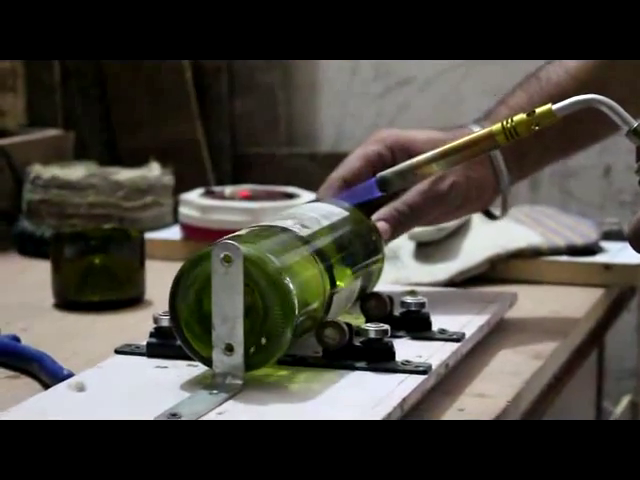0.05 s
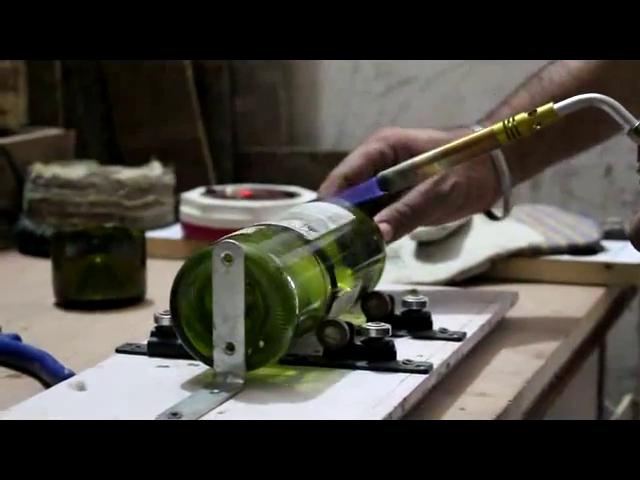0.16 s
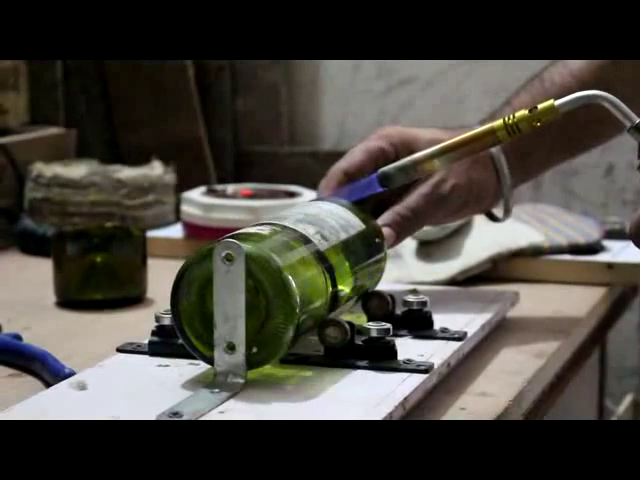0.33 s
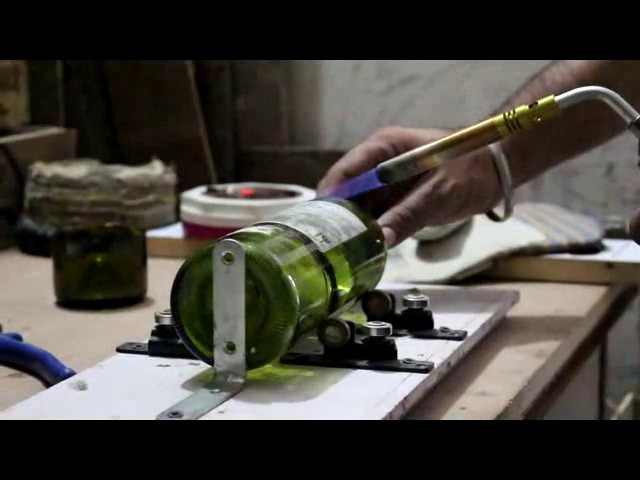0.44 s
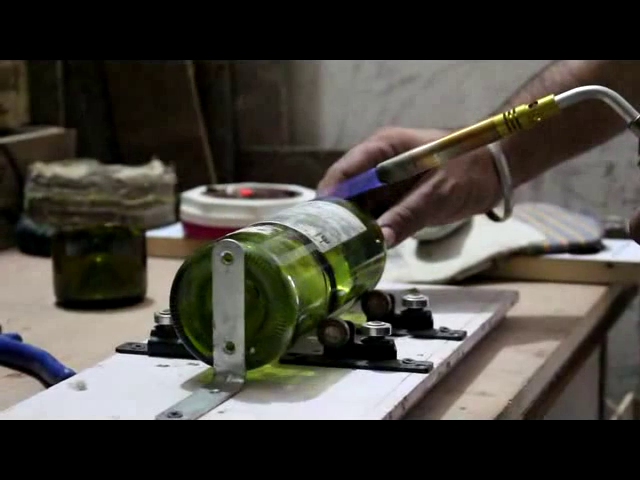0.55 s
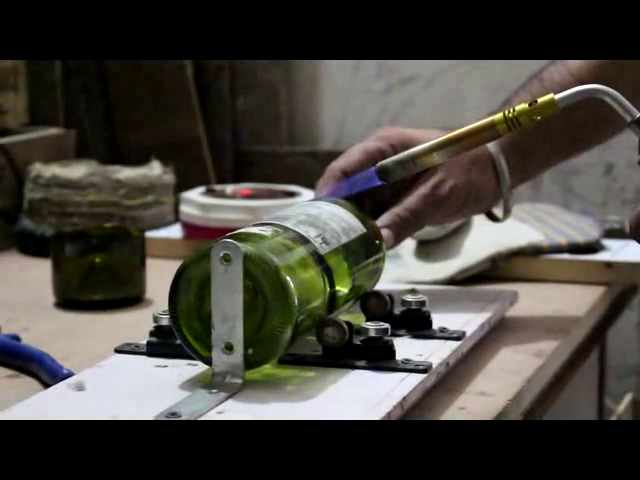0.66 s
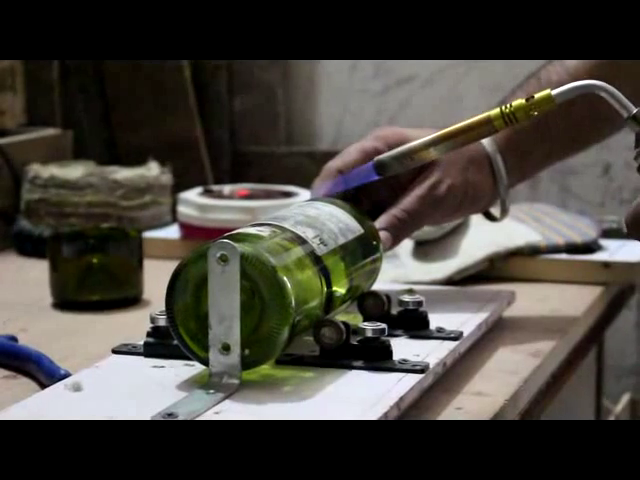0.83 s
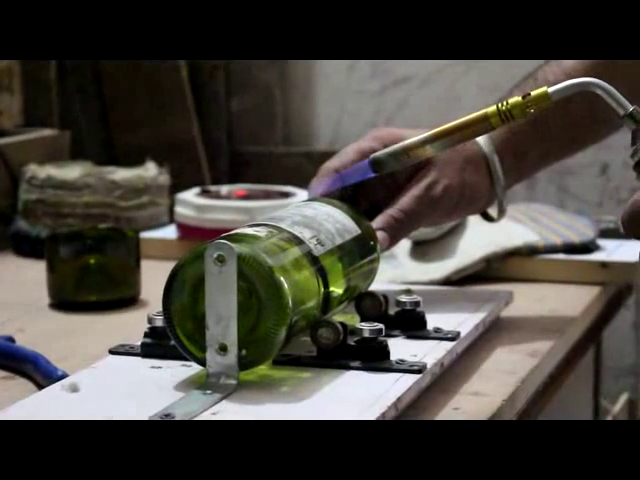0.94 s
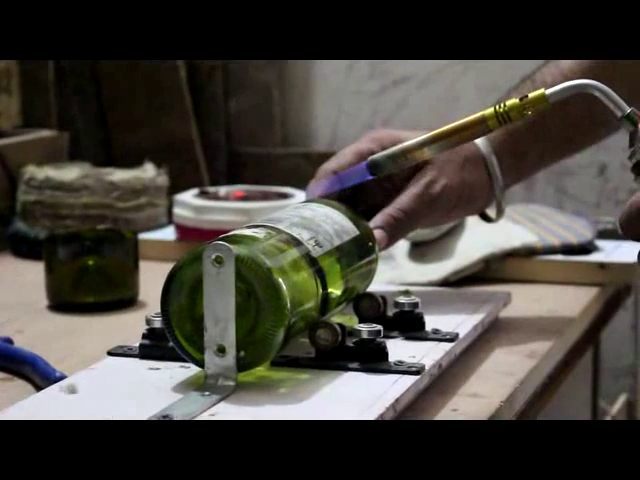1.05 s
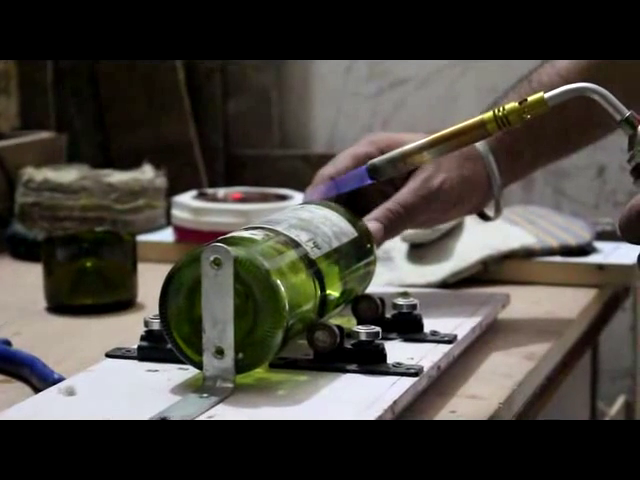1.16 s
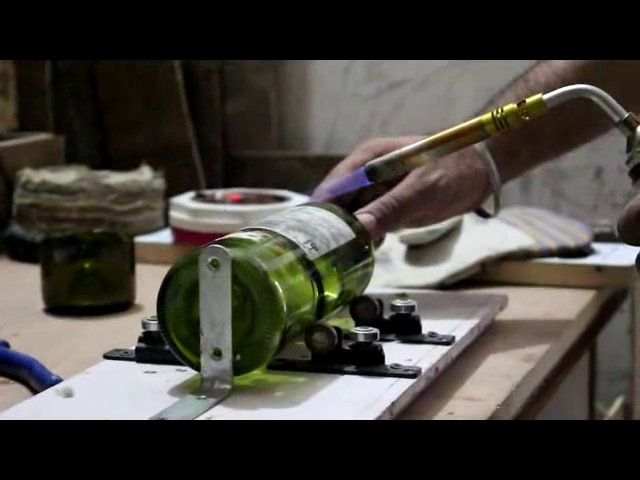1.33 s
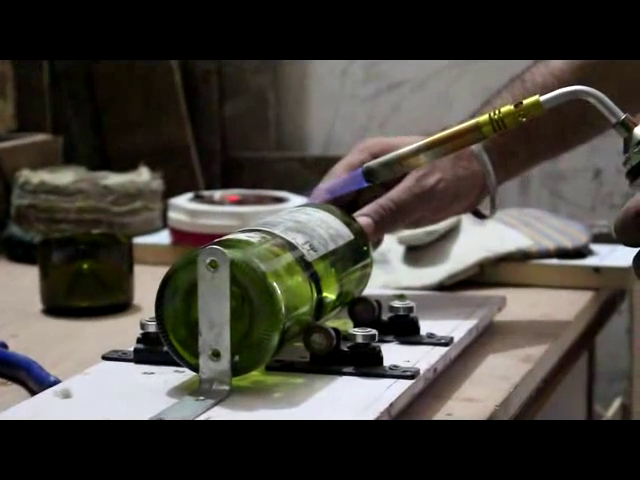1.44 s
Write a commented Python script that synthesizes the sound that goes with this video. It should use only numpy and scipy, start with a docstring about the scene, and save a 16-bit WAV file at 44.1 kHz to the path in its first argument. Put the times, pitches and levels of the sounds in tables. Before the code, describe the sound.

One sharp, ringing crack of heated glass while a gas torch burns steadily.

```python
"""A gas torch rushes steadily in a small workshop, while a glass bottle turning on rollers scuffs in its
cradle and a faint whistle falls twice, a second apart. The heated bottle cracks with one sharp clink:
the fracture excites the modes of the glass, the room reverberates, and an automatic gain control
ducks for a moment. The flame burns on, with a brief puff of hiss near the end."""
import sys
import numpy as np
from scipy import signal
from scipy.fft import rfft, irfft, next_fast_len
from scipy.io import wavfile
from scipy.ndimage import uniform_filter1d, minimum_filter1d, map_coordinates

SR = 44100
rng = np.random.default_rng(int(sys.argv[2]) if len(sys.argv) > 2 else 0)


def generate_wav(signal):
    """Clip the signal to [-1, 1] and save it as 16-bit WAV at the path in sys.argv[1]."""
    frames = np.transpose(np.atleast_2d(signal))
    scaled = np.clip(frames, -1, 1) * 32767
    pcm = np.round(scaled).astype(np.int16)
    wavfile.write(sys.argv[1], SR, pcm)


N = 66150


def amp(db):
    """Decibels to amplitude ratio."""
    return 10 ** (np.asarray(db) / 20)

def unit(x):
    """Normalisation to rms 1."""
    return x / np.sqrt(np.mean(x ** 2) + 1e-20)

def along(points, hz):
    """Interpolation on a logarithmic frequency axis."""
    freqs, values = np.transpose(points)
    return np.interp(np.log(hz + 1), np.log(freqs + 1), values)

def since(start_s):
    """Seconds after an onset, zero before it."""
    return np.maximum(np.arange(N) / SR - start_s, 0)

def pan(db):
    """Channel gains for an interaural level difference, left minus right."""
    return amp(np.array([[.5], [-.5]]) * db)

def wobble(rate_hz):
    """Smooth random modulation: a spline through rate_hz knots a second."""
    knots = rng.standard_normal(int(N * rate_hz / SR) + 4)
    return map_coordinates(knots, [np.arange(N) * rate_hz / SR])

def filtered(x, response):
    """Linear filtering: the spectrum times a frequency response."""
    size = next_fast_len(N + SR // 2)
    return irfft(rfft(x, size) * response(np.fft.rfftfreq(size, 1 / SR)), size)[..., :N]

def low_cut(x, hz):
    """A causal second-order high-pass."""
    return signal.sosfilt(signal.butter(2, hz, "highpass", fs=SR, output="sos"), x)


# interaural correlation of the bench noises: frequency_hz, correlation
BENCH_CORRELATION = [(60, -0.14), (150, 0.83), (380, 0.56), (950, 0.79), (2380, 0.57), (5980, 0.33),
                     (15000, -0.5)]
# their interaural level difference: frequency_hz, left_minus_right_db
BENCH_BALANCE = [(60, -34), (110, -3), (200, -7), (380, -8.5), (700, -11.5), (1290, -11), (2380, -5),
                 (4400, -5.5), (8120, -1.5), (15000, -1.5)]

def bench_noise(response):
    """Partial coherence: independent mid and side noises mix into a broad source right of centre."""
    def mid_side_gains(hz):
        angle = np.arccos(np.clip(along(BENCH_CORRELATION, hz), -1, 1)) / 2
        return response(hz) * [np.cos(angle), np.sin(angle)]
    mid, side = filtered(rng.standard_normal((2, N)), mid_side_gains)
    stereo = np.array([mid + side, mid - side])
    return unit(filtered(stereo, lambda hz: pan(along(BENCH_BALANCE, hz))))


# spectral shape of the flame: frequency_hz, level_db
FLAME_SPECTRUM = [(18, -72), (30, -26), (59, -42), (88, -24.5), (174, -16), (198, -9.5), (244, 0),
                  (279, -3.5), (382, 0), (413, -6.5), (447, -2.5), (612, -6.5), (698, -1), (795, -10),
                  (1030, -9.5), (1120, -14), (1240, -8.5), (1840, -7), (2040, -6), (2390, -19), (4260, -22),
                  (4860, -20), (5990, -31.5), (11800, -38), (15800, -44)]
# resonances of flame and burner: centre_hz, half_width_hz, level_db
BURNER_RESONANCES = [(407, 29, -49.5), (732, 36, -51), (1027, 23, -54), (1737, 59, -57.5), (2082, 38, -49),
                     (4867, 73, -59.5)]
# envelope of the flame's upper band: time_s, gain_db
FLAME_SWELL = [(0, 1.5), (.2, 0), (.52, 1.5), (0.698, -2), (.9, 0.5), (.98, -.5), (1.08, .5), (1.24, -1),
               (1.33, -5.5), (1.38, 1), (1.44, -3), (1.5, 1.5)]

def torch(level_db=-38, crossover_hz=850, flutter_db=.54):
    """Broadband flame noise with burner resonances; amplitude modulation makes it swell and flutter."""
    flame = amp(level_db) * bench_noise(lambda hz: amp(along(FLAME_SPECTRUM, hz)))
    for centre, half_width, db in BURNER_RESONANCES:
        flame += amp(db) * bench_noise(lambda hz: 1 / (1 + ((hz - centre) / half_width) ** 2))
    low = filtered(flame, lambda hz: 1 / (1 + (hz / crossover_hz) ** 4))
    swell_db = np.interp(since(0), *np.transpose(FLAME_SWELL))
    return (low + (flame - low) * amp(swell_db)) * amp(flutter_db * wobble(45.03))


# tones inside the rush: pitch_hz, level_db
WHINE_TONES = [(96, -74), (711, -57)]

def whine(wander_rad=.7, wander_hz=14.05):
    """Random phase modulation makes two faint tones slightly unsteady."""
    tones = np.zeros(N)
    for hz, db in WHINE_TONES:
        phase = 2 * np.pi * hz * since(0) + wander_rad * wobble(wander_hz)
        tones += amp(db) * unit(np.sin(phase))
    return tones * pan(-8)


# rubs of the bottle on its cradle: start_s, length_s, level_db
SCUFF_EVENTS = [(0.02, 0.027, -41.5), (0.482, 0.033, -39), (0.742, 0.021, -46), (0.863, 0.011, -38.5),
                (0.897, 0.039, -49), (1.013, 0.02, -43), (1.227, 0.024, -41.5), (1.484, .03, -51)]
# spectral shape of the rubbing: frequency_hz, level_db
SCUFF_SPECTRUM = [(200, -35), (1200, 6.5), (2100, 17.5), (2600, -3), (4200, 3.5), (4950, 10.5), (5600, -30),
                  (12000, -42)]

def scuffs(attack_s=.002, release_s=.028, grit_db=2):
    """Friction noise: the turning glass catches and rubs in short, gritty bursts."""
    envelope = np.zeros(N)
    for start, length, db in SCUFF_EVENTS:
        rise = 1 - np.exp(-since(start) / attack_s)
        envelope += amp(db) * rise * np.exp(-since(start + length) / release_s)
    grit = unit(amp(grit_db * wobble(400)))
    return envelope * grit * bench_noise(lambda hz: amp(along(SCUFF_SPECTRUM, hz)))


# faint falling whistles: start_s, level_db
WHISTLE_EVENTS = [(.125, -56.5), (1.115, -56.5)]

def whistles(start_hz=4900, fall_octaves_per_s=7, length_s=.16, width_hz=600):
    """Narrowband noise is heard as an airy pitch, which falls as the band glides down."""
    out = np.zeros(N)
    for start, db in WHISTLE_EVENTS:
        t = since(start)
        phase = 2 * np.pi * np.cumsum(start_hz * 2 ** (-fall_octaves_per_s * t)) / SR
        band = wobble(width_hz) * np.sin(phase) + wobble(width_hz) * np.cos(phase)
        envelope = np.sqrt(np.sin(np.pi * np.minimum(t / length_s, 1)))
        out += amp(db) * band * envelope
    return out * pan(-9)


# jumps of the fracture through the glass: start_s, relative_level_db
CRACK_JUMPS = [(0.2492, 11), (0.2505, 4.5), (0.2542, -32), (0.2552, 4.5), (0.2574, -7), (0.268, 5.5)]
# spectral shape of the fracture: frequency_hz, level_db
SNAP_SPECTRUM = [(100, -60), (400, -8), (700, -27), (1000, -12.5), (1450, -17.5), (1800, -1.5), (2900, -1),
                 (3450, -12.5), (3830, 2.5), (4130, -14), (4450, 1.5), (5200, -8.5), (6100, -4),
                 (6550, -23), (7300, -12.5), (7950, -23), (9000, -15), (11400, -14), (12700, -28),
                 (14400, -20), (15800, -27)]
# its stereo width: frequency_hz, side_to_mid_ratio
SNAP_SPREAD = [(500, 0.27), (3000, 0.59), (8000, 0.72), (14000, 0.82)]
BOTTLE_PAN_DB = -4.5

def crack(level_db=-8, t60_s=.032, radiation_cutoff_hz=480):
    """Brittle fracture: each jump is a snap coloured by the glass wall, which radiates little bass."""
    def mid_side_gains(hz):
        return amp(along(SNAP_SPECTRUM, hz)) * [np.ones_like(hz), along(SNAP_SPREAD, hz)]
    bursts = sum(amp(db - 60 * since(start) / t60_s) * (since(start) > 0) for start, db in CRACK_JUMPS)
    mid, side = filtered(rng.standard_normal((2, N)), mid_side_gains)
    noise = unit(np.array([mid + side, mid - side]))
    return low_cut(amp(level_db) * bursts * noise * pan(BOTTLE_PAN_DB), radiation_cutoff_hz)


# normal modes of the bottle: pitch_hz, relative_level_db, t60_s
BOTTLE_MODES = [(1901, -5, .28), (2150, -2, .12), (2188, -5, .24), (2368, -5, .22), (2427, -2, .26),
                (2611, -8, .26), (2870, 2, .19), (3236, -10, .24), (3742, -3, .29), (3793, -8, .36),
                (3860, 1, .16), (3950, -1, .23), (4419, -2, .17), (4615, -5, .28), (4843, -7, .35),
                (5604, 1, .19), (5808, -5, .24), (6035, -1, .22), (7063, -17, .32), (10950, -7, .14),
                (11700, -14, .28), (12305, -23, .32), (13260, -16, .23), (14400, -11, .24)]

def ringing(level_db=-14, spread_hz=13000, wander_rad=.5, wander_hz=45):
    """Free vibration: released by the first jump, the glass rings in exponentially damped modes."""
    t = since(CRACK_JUMPS[0][0])
    ring = np.zeros((2, N))
    for hz, db, t60 in BOTTLE_MODES:
        # higher modes tend to differ more in phase between the ears
        ear_phase = np.array([[1], [-1]]) * rng.standard_normal() * hz / spread_hz
        phase = ear_phase + np.pi * rng.integers(2) + wander_rad * wobble(wander_hz)
        ring += amp(db - 60 * t / t60) * np.sin(2 * np.pi * hz * t + phase)
    return amp(level_db) * ring * (t > 0) * pan(BOTTLE_PAN_DB)


# reverberation time of the workshop: frequency_hz, t60_s
ROOM_DECAY = [(300, 1), (2000, 0.29), (5000, 0.31), (9000, 0.28), (14000, 0.21)]

def reverberation(x, level_db=-4.5, low_cut_hz=790, gap_s=.0039):
    """A diffuse field: convolution with a noise tail, different at each ear, whose treble dies first."""
    hz, t, spectra = signal.stft(rng.standard_normal((2, SR)), SR, nperseg=256)
    decay = amp(-60 * t / along(ROOM_DECAY, hz)[:, None])
    tail = signal.istft(spectra * decay, SR, nperseg=256)[1]
    tail /= np.linalg.norm(tail[0])
    delayed = np.pad(low_cut(x, low_cut_hz).mean(0), (int(gap_s * SR), 0))
    return amp(level_db) * signal.fftconvolve(delayed[None], tail, axes=1)[:, :N] * pan(-6.5)


def early_reflections(x, level_db=-12.5, count=12, delay_range_s=(.006, .035)):
    """Superposition: the bench and near walls return delayed copies of random polarity to each ear."""
    delays = rng.uniform(*delay_range_s, (2, count, 1))
    signs = rng.choice([-1, 1], (2, count, 1))
    copies = filtered(x, lambda hz: np.sum(signs * np.exp(-2j * np.pi * hz * delays), axis=1))
    return amp(level_db) * copies / np.sqrt(count)


# hissing puffs of the flame: peak_s, level_db
PUFF_EVENTS = [(1.155, -64), (1.324, -48)]
# spectral shape of a puff: frequency_hz, level_db
PUFF_SPECTRUM = [(2000, -2), (4000, 5), (8000, -9.5), (15000, -20)]

def puffs(half_width_s=.029):
    """Treble noise under Gaussian envelopes brightens the flame for an instant."""
    envelope = sum(amp(db) * np.exp(-((since(0) - peak) / half_width_s) ** 2) for peak, db in PUFF_EVENTS)
    return envelope * bench_noise(lambda hz: amp(along(PUFF_SPECTRUM, hz)))


def scene():
    """Linear superposition of the sources; only the snap and, more weakly, the ring excite the room."""
    snap, ring = crack(), ringing()
    into_room = snap + amp(-12) * ring
    echoes = early_reflections(into_room) + reverberation(into_room)
    return snap + ring + echoes + torch() + whine() + puffs() + scuffs() + whistles()


def record(dry, ceiling_db=-6, react_s=.002, hold_s=.027, recover_db_per_s=103, band_hz=(70, 15700)):
    """Automatic gain control ducks, holds and recovers; clipping and band limiting follow."""
    react = int(react_s * SR)
    hold = 2 * int(hold_s * SR / 2) + 1
    power = uniform_filter1d(np.max(dry ** 2, axis=0), size=react // 2)
    level_db = 10 * np.log10(np.abs(power) + 1e-12)
    duck_db = np.minimum(ceiling_db - level_db, 0)
    held_db = minimum_filter1d(duck_db, hold, origin=hold // 2, mode="nearest")
    climb_db = recover_db_per_s * since(0)
    gain_db = np.minimum.accumulate(held_db - climb_db) + climb_db  # caps the rate of recovery
    smooth_db = uniform_filter1d(minimum_filter1d(gain_db, 2 * react), react)
    clipped = np.clip(dry * amp(smooth_db), -1, 1)
    return filtered(low_cut(clipped, band_hz[0]), lambda hz: hz < band_hz[1])


dry = scene()
out = record(dry)
generate_wav(out)
```